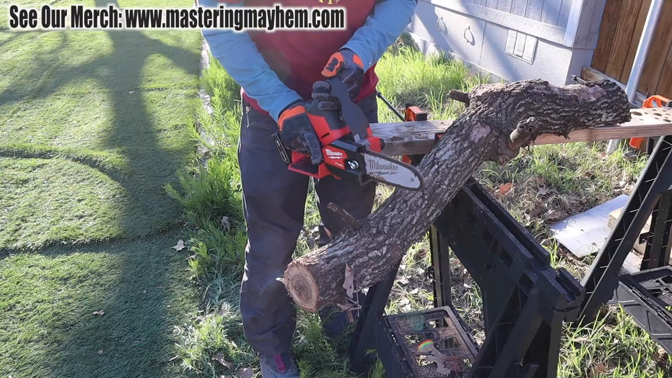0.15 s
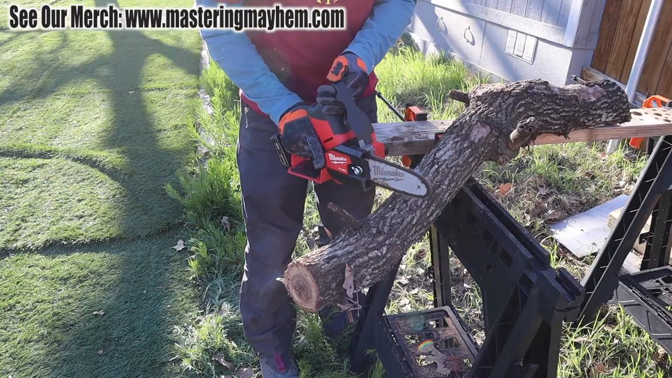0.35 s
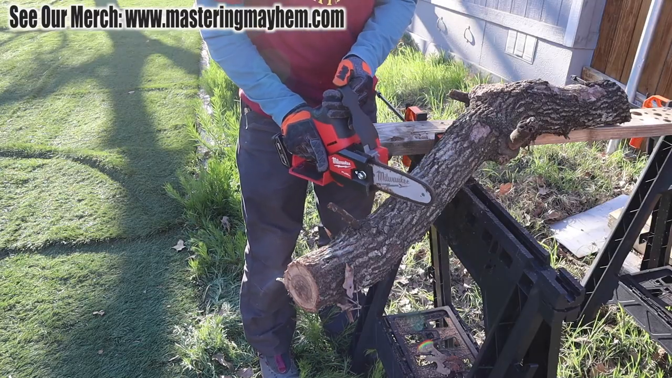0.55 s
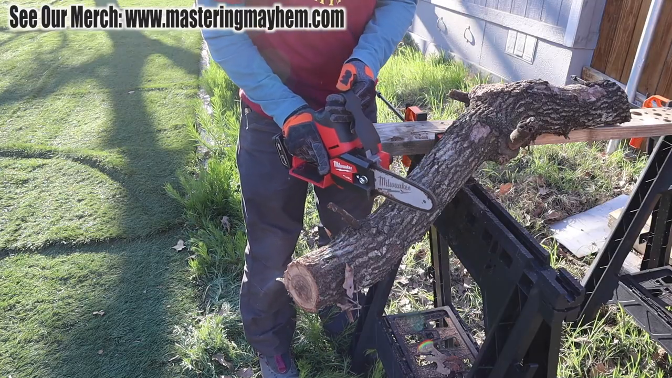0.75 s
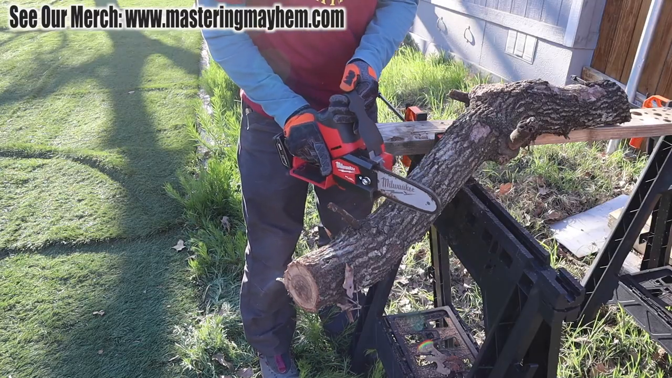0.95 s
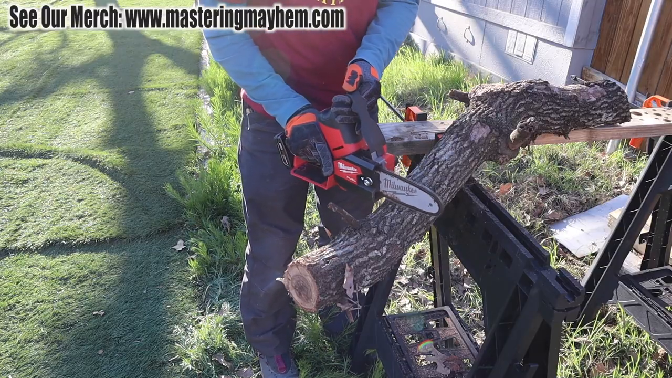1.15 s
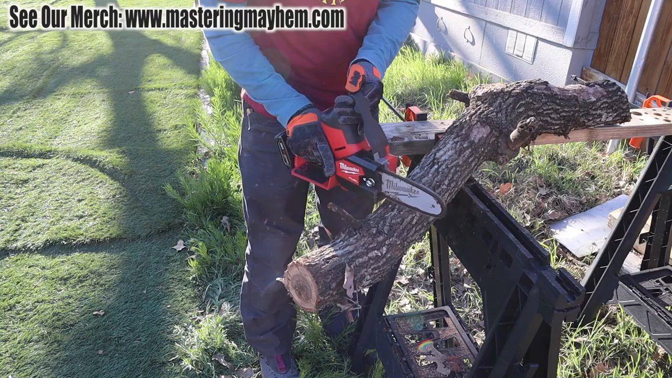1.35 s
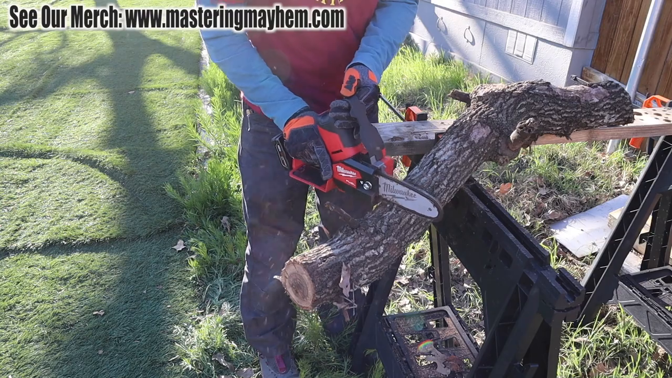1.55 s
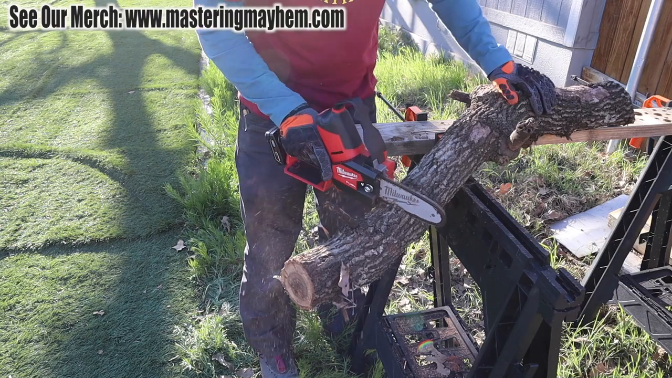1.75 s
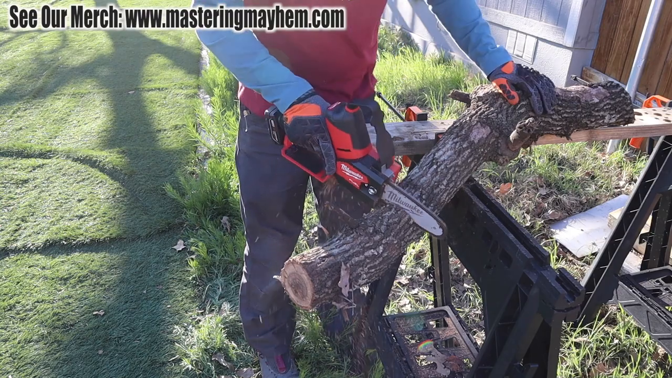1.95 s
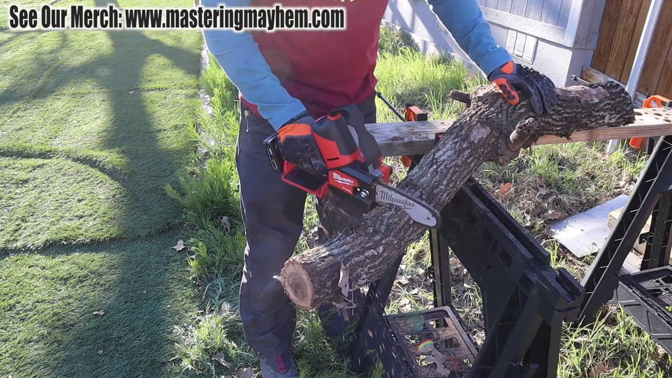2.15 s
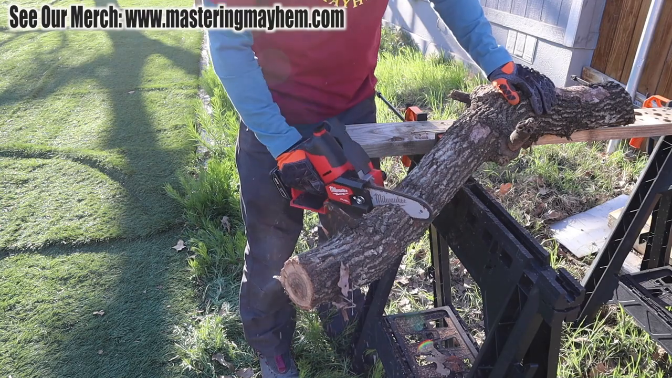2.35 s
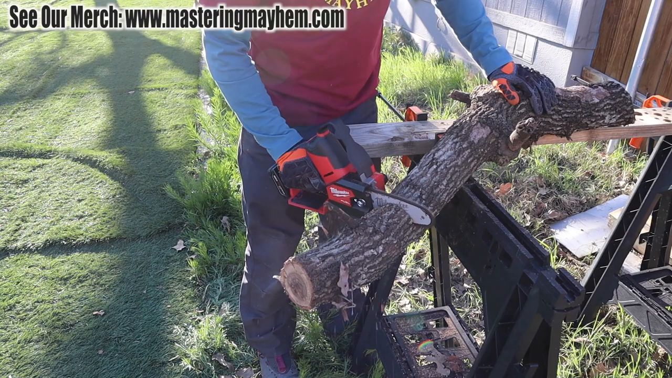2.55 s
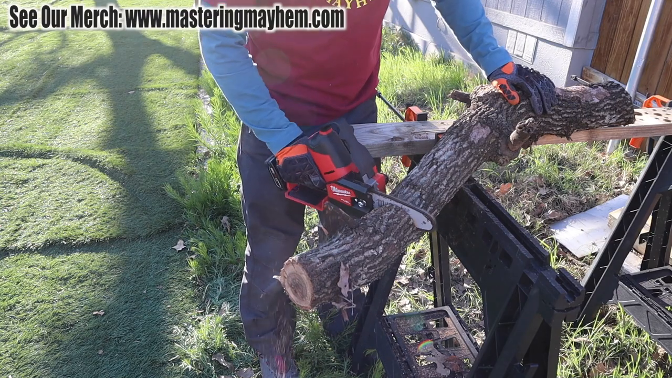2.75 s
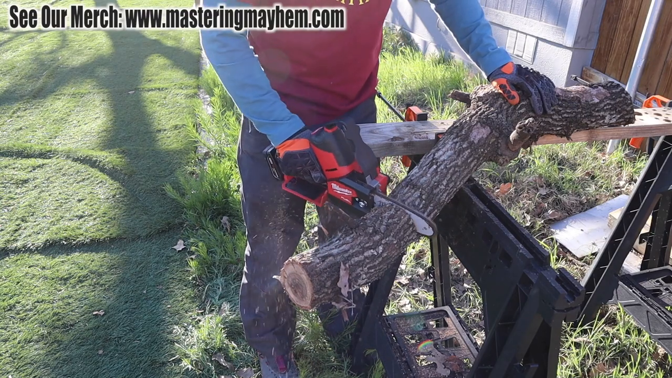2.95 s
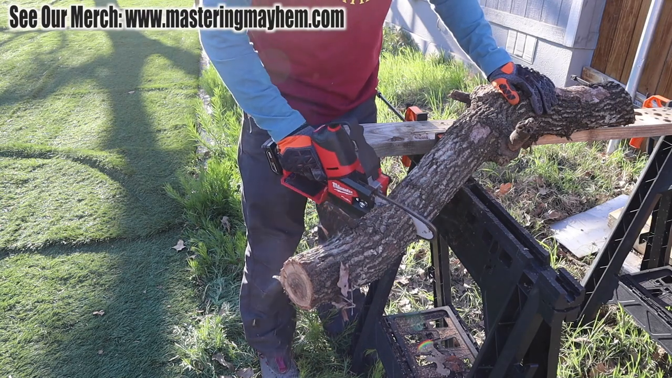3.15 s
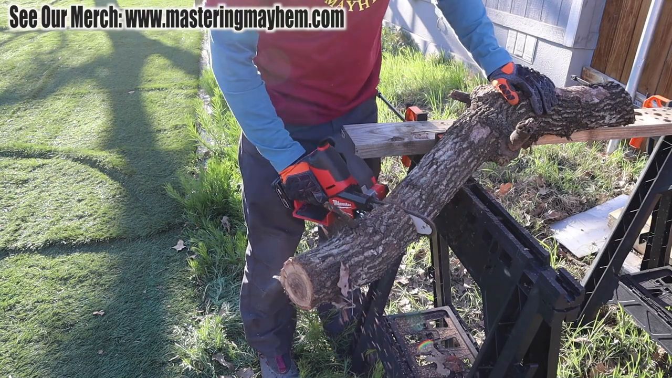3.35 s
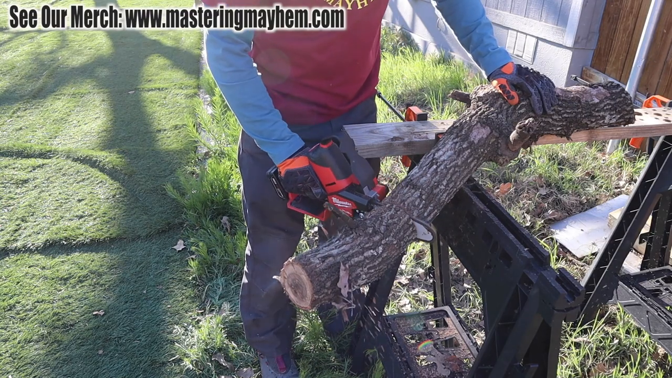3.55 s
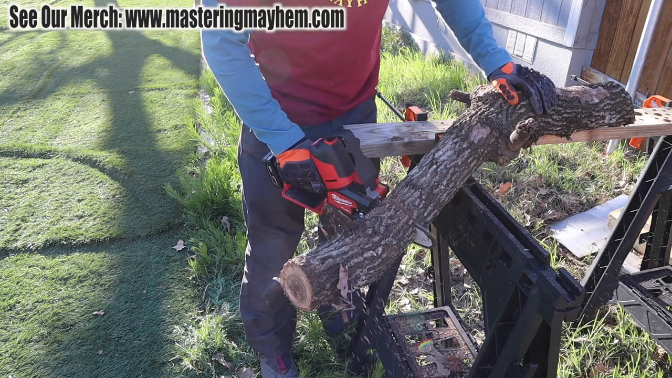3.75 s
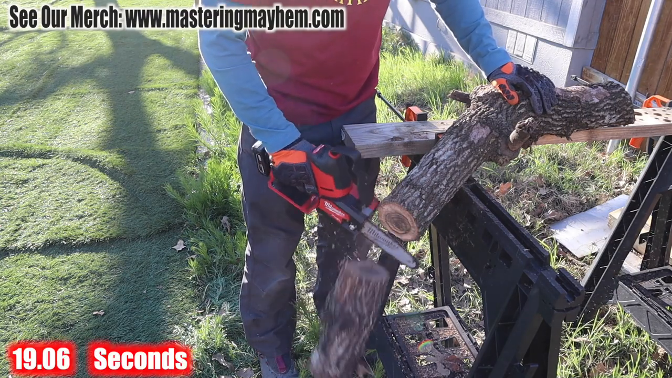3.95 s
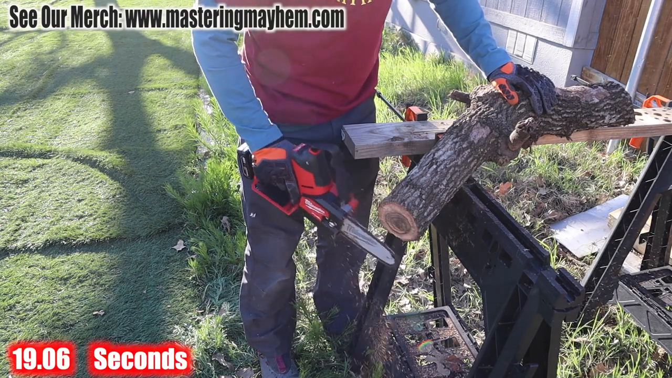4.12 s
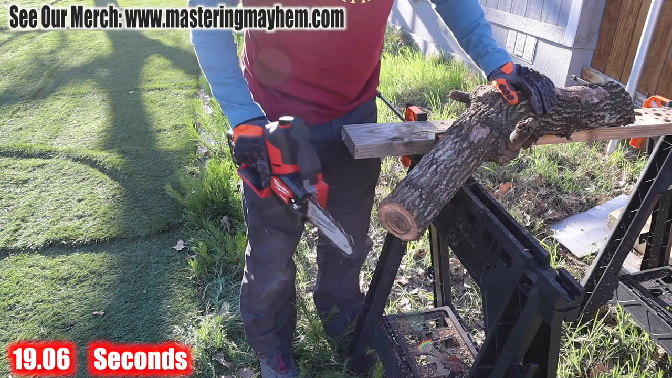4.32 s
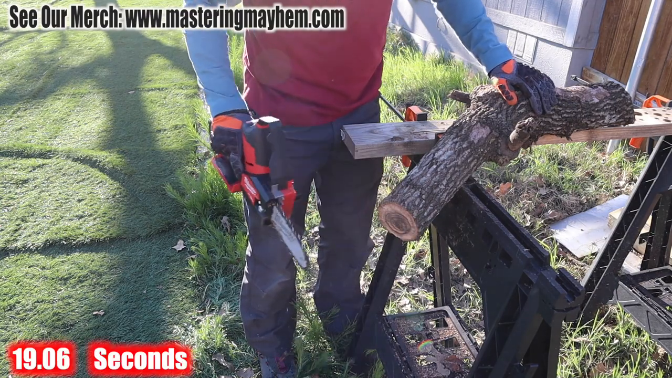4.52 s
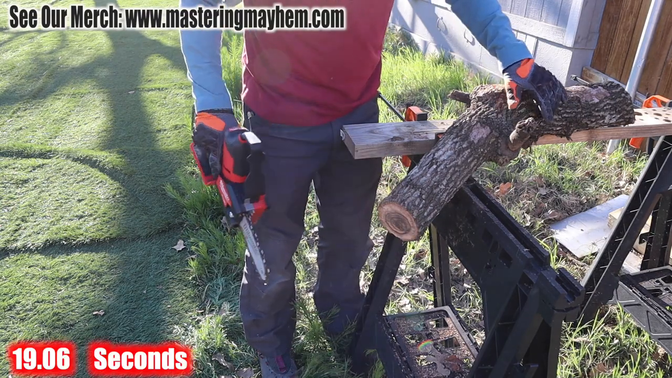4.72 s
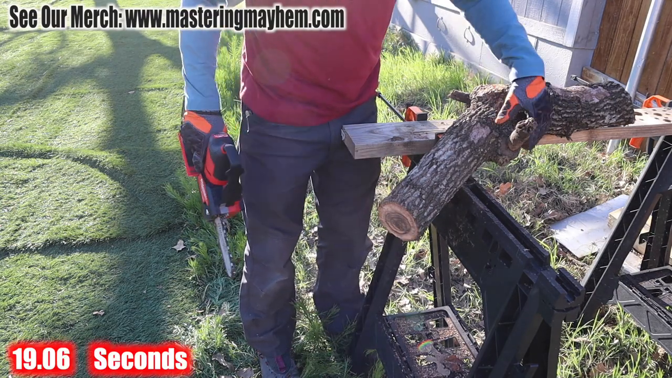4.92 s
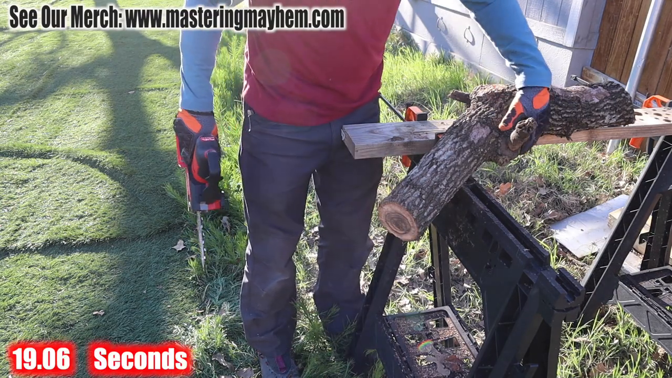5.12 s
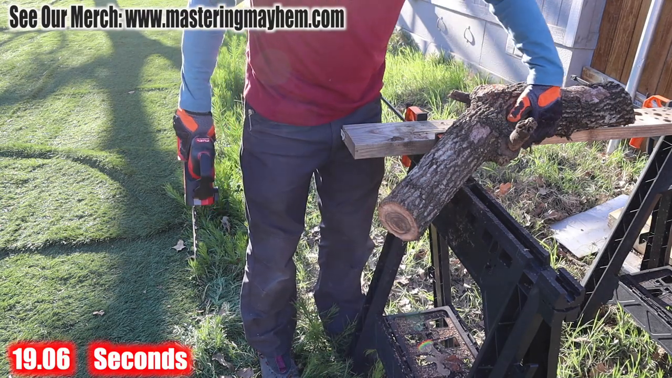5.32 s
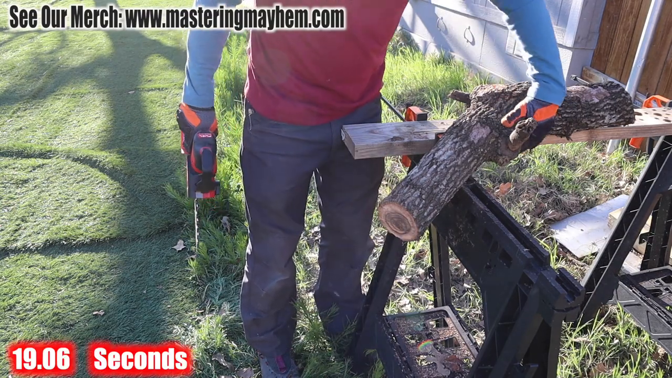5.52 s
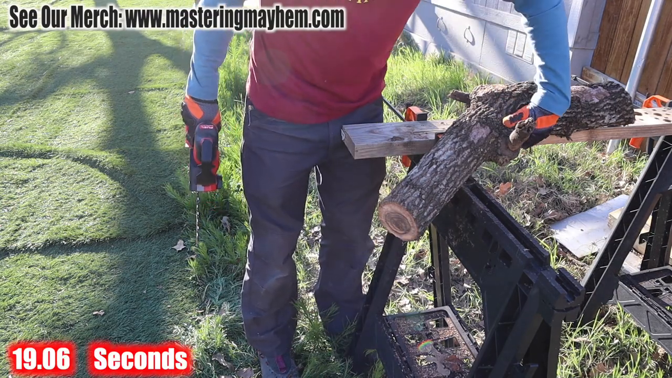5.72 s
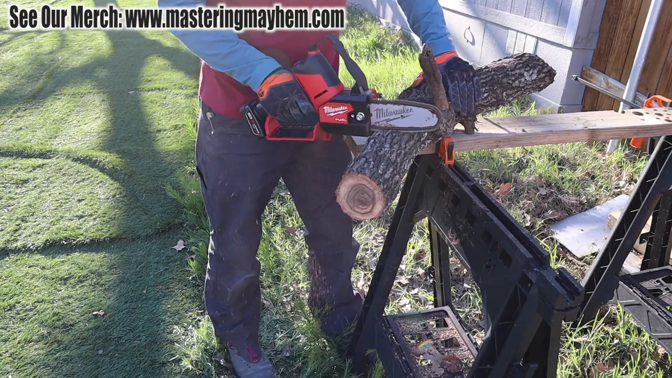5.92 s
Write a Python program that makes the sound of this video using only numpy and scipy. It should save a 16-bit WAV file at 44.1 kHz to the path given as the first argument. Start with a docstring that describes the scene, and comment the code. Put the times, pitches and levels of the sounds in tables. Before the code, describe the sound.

Outdoors and close to the microphone, a small battery chainsaw runs free with a bright rattling whine, snags bark, then digs into a log, dropping in pitch with a fuzzy squeal. The offcut lands with a hard thud as the chain coasts down, knocking and ticking to a stop. Glove rubs on bark follow in near quiet, then the saw abruptly restarts.

```python
"""Outdoors, close by: a cordless pruning saw runs free, bites into a log and cuts through it.
Chain links strike and scrape in the bar as noise paced by the shaft; motor and gears whine at multiples
of its speed, which sags under load. Log, bar and kerf answer as resonances driven by noise. The offcut thuds
on the ground, the chain coasts and knocks to a stop, a glove rubs the bark, and the saw starts again.
Light wind and a far hum lie behind, as coloured noise."""
import sys
import numpy as np
from scipy import signal
from scipy.fft import rfft, irfft
from scipy.io import wavfile
from scipy.ndimage import uniform_filter1d

SR = 44100
rng = np.random.default_rng(int(sys.argv[2]) if len(sys.argv) > 2 else 0)


def inscribe(sig):
    """Save sig as 16-bit PCM at rate SR to the path in sys.argv[1].

    A 1-D sig is mono; a 2-D sig holds one channel per row.
    Samples are clipped to [-1, 1] before scaling.
    """
    pcm = np.round(np.clip(np.atleast_2d(sig).T, -1, 1) * 32767)
    wavfile.write(sys.argv[1], SR, pcm.astype(np.int16))


N = 263541
T = np.arange(N) / SR  # time [s]

# trigger let go, motor silent, trigger pulled again [s]
RELEASE_S, STOP_S, RESTART_S = 3.95, 4.79, 5.886
SLACKEN_S = 0.033  # time the chain takes to go slack [s]


def amp(db):
    """Level law: decibels to amplitude gain."""
    return 10 ** (np.asarray(db) / 20)


def unit(x):
    """Normalisation by signal power: scales to rms 1."""
    return x / np.sqrt(np.mean(x ** 2) + 1e-20)


def curve(rows, axis=1):
    """Linear interpolation in time of one column of a table."""
    rows = np.array(rows)
    return np.interp(T, rows[:, 0], rows[:, axis])


def wander(hz):
    """Low-passed random fluctuation of rms 1, slow beside the given rate."""
    f = np.fft.rfftfreq(N, 1 / SR)
    lowpass = 1 / (1 + (f / hz) ** 4)
    return unit(irfft(rfft(rng.standard_normal(N)) * lowpass, N))


def colour(x, points):
    """Minimum-phase filtering: a causal response of unit energy with the given spectrum shape."""
    size = 4096
    hz, db = np.transpose(points)
    log_hz = np.log(abs(np.fft.fftfreq(size, 1 / SR)) + 1)
    log_gain = np.log(amp(np.interp(log_hz, np.log(hz), db)))
    # the Hilbert transform of the log gain gives the minimum phase
    spectrum = np.exp(np.conj(signal.hilbert(log_gain)))
    response = np.fft.ifft(spectrum).real[:size // 2]
    return signal.oaconvolve(x, response / np.linalg.norm(response))[:N]


def scrape(force, points):
    """Friction noise: a random contact force of changing strength excites one colour."""
    return colour(force * rng.standard_normal(N), points)


def swells(rows):
    """Gaussian envelopes: smooth rises and falls of gain, one for each row."""
    return sum(amp(db) * np.exp(-((T - s) / half_s) ** 2) for s, half_s, db in rows)


def gate(start_s, end_s, edge_s):
    """Trapezoidal envelope: one between two times, with straight edges."""
    return np.clip(np.minimum(T - start_s, end_s - T) / edge_s, 0, 1)


def resonate(x, hz, width):
    """Heterodyne resonance: two equal poles whose centre follows the curve hz."""
    turn = np.exp(2j * np.pi * np.cumsum(hz) / SR)
    r = np.exp(-np.pi * width / SR)
    # shift the centre down to zero frequency, low-pass, and shift back
    baseband = signal.lfilter([(1 - r) ** 2], np.poly([r, r]), x / turn)
    return (turn * baseband).real


def bursts(rows, points, decay_s):
    """Impact noise: exponentially dying contact forces excite one colour."""
    envelope = np.zeros(N)
    t = np.arange(2000) / SR
    for s, db in rows:
        part = envelope[round(s * SR):][:len(t)]
        part += amp(db) * np.exp(-t[:len(part)] / decay_s)
    return scrape(envelope, points)


# depth of the chain in the wood, taken as the share of full load: (time [s], share [0-1])
BITE_DEPTH = [(0, 0), (.8, 0), (1.45, 0.1), (1.9, 0.31), (2.3, 0.58), (2.6, 0.91), (3.9, 1), (4.3, 0),
              (6, 0.16)]


def bite_share():
    """Loading: the share of full load on the chain, from 0 to 1."""
    return np.clip(curve(BITE_DEPTH), 0, 1)


def in_wood():
    """Contact condition: one until the bar breaks through the log, then zero."""
    return np.clip((RELEASE_S - T) / SLACKEN_S, 0, 1)


def coasting():
    """Free run-down: zero under power, rising to one as the chain goes slack."""
    return np.clip((T - RELEASE_S) / SLACKEN_S, 0, 1) * (T < RESTART_S)


BREEZE_DB, FAR_DB = -62, -54.5  # steady levels [dB]
# gusts of wind on the microphone: (time of peak [s], half length [s], level [dB])
WIND_GUSTS = [(.7, .08, -54), (1.15, 0.13, -47), (2.2, .2, -51), (2.75, .15, -50), (3.8, 0.17, -54),
              (4.5, 0.28, -57), (5.1, 0.38, -50.5), (5.62, 0.15, -52)]
# the one swell of the far hum: (time of peak [s], half length [s], level [dB])
FAR_SWELL = [(5.72, 0.24, -53.5)]
# colour of the wind: (frequency [Hz], relative level [dB per Hz])
WIND_COLOUR = [(8, -12.5), (20, -3.5), (38, -3.5), (60, -10), (120, -18), (300, -45.5)]
# colour of the far hum: (frequency [Hz], relative level [dB per Hz])
HUM_COLOUR = [(41, -20.5), (70, -9), (118, -11.5), (156, -9.5), (440, -13), (535, -6.5), (599, -12),
              (689, -6), (792, -11.5), (2000, -32), (2600, -58), (4400, -120)]


def air():
    """Turbulent pressure noise of light wind on the microphone, and the far hum of the neighbourhood."""
    wind = scrape(amp(BREEZE_DB) + swells(WIND_GUSTS), WIND_COLOUR)
    hum = scrape(amp(FAR_DB) + swells(FAR_SWELL), HUM_COLOUR)
    return wind + hum


GLOVE_REST_DB = -61.5  # the glove shifting between strokes [dB]
# strokes of the glove over the bark: (time of peak [s], half length [s], level [dB])
GLOVE_STROKES = [(5.345, .035, -48.5), (5.41, 0.016, -58), (5.51, 0.053, -53), (5.59, 0.033, -50),
                 (5.7, .06, -62), (5.8, 0.092, -54.5)]
# colour of glove on bark: (frequency [Hz], relative level [dB per Hz])
BARK_COLOUR = [(590, -26), (1000, 2), (2200, -1), (2680, -3), (3210, 0.5), (3980, -3.5), (5660, -8.5),
               (7770, -18), (9430, -17), (15000, -23)]


def glove():
    """Stick-slip friction: fabric catches on the bark in fine grains."""
    grains = unit(rng.standard_normal(N) * amp(3.5 * wander(330)))
    stroke_gain = amp(GLOVE_REST_DB) + swells(GLOVE_STROKES)
    return (T > STOP_S) * stroke_gain * colour(grains, BARK_COLOUR)


# the thin ring after the stop: (time of peak [s], half length [s], level [dB])
THIN_RING_SWELL = [(5.24, .14, -63)]
# its narrow colour: (frequency [Hz], relative level [dB per Hz])
RING_COLOUR = [(2700, -50), (3090, -12), (3170, 0), (3250, -15), (3700, -48)]


def ring():
    """Narrow-band resonance: a faint ring that swells and fades."""
    return scrape(swells(THIN_RING_SWELL), RING_COLOUR)


# sharp clicks of splinter, chain and trigger: (time [s], level [dB])
CLICK_TIMES = [(4.1765, -16.5), (4.9275, -27), (5.037, -48), (5.049, -37), (5.243, -46), (5.268, -44),
               (5.448, -43), (5.503, -36.5), (5.532, -43), (5.8595, -42)]
# colour of a click: (frequency [Hz], relative level [dB per Hz])
CLICK_COLOUR = [(400, 3), (1200, -1), (3200, 2), (4400, 1), (5250, 7.5), (6500, -0.5), (9000, -3),
                (15000, -27)]


def clicks():
    """Brief impact: a very short force excites a wide band."""
    return bursts(CLICK_TIMES, CLICK_COLOUR, decay_s=0.0017)


RATCHET_S, RATCHET_GAP_S = 4.819, .01235  # first tick, spacing [s]
RATCHET_DB, RATCHET_STEP_DB = -26, -.5  # level of the first tick, change at each further one [dB]


def ratchet(count):
    """Periodic impact: the last links tick evenly over the sprocket, each softer, as rows (s, dB)."""
    return [(RATCHET_S + k * RATCHET_GAP_S, RATCHET_DB + k * RATCHET_STEP_DB) for k in range(count)]


# stray knocks of the slack chain: (time [s], level [dB])
STRAY_KNOCKS = [(4.648, -26), (4.7, -29), (4.754, -27.5), (4.797, -29.5), (4.805, -29), (4.813, -27)]
# colour of a link knocking: (frequency [Hz], relative level [dB per Hz])
KNOCK_COLOUR = [(300, -24), (560, -19), (700, -9.5), (920, 1.5), (1200, -2), (1430, -3.5), (1750, -11),
                (2200, -11.5), (3800, -21), (4400, -27), (5000, -23), (6500, -47), (8900, -30),
                (10500, -53)]


def knocks():
    """Impact of loose bodies: slack links strike singly and then in an even run."""
    return bursts([*STRAY_KNOCKS, *ratchet(count=9)], KNOCK_COLOUR, decay_s=0.0042)


# teeth snag on bark and throw chips: (time [s], level [dB])
SNAG_TIMES = [(.311, -22.5), (.785, -14.5), (.988, -12), (1.09, -15), (1.155, -10.5), (1.298, -10),
              (1.331, -8.5), (1.404, -11), (1.444, -10), (1.615, -10), (1.733, -28), (2.342, -14),
              (2.55, -22), (2.645, -9.5), (2.652, -16.5), (2.692, -22), (2.788, -15.5), (3.374, -13),
              (3.772, -20), (3.916, -13)]
# colour of a snag: (frequency [Hz], relative level [dB per Hz])
SNAG_COLOUR = [(300, -20.5), (1200, -2), (2200, -0.5), (3600, 2), (7000, -10), (13000, -11), (16000, -19)]


def snags():
    """Fracture impact: a tooth catches and its force dies within milliseconds."""
    return bursts(SNAG_TIMES, SNAG_COLOUR, decay_s=0.0026)


# the log jumps under the bar, then the offcut lands: (time [s], level [dB], pitch factor)
THUD_BLOWS = [(1.592, -32, 0.46), (1.902, -19, 0.35), (2.062, -42, 0.35), (2.553, -26, 0.48),
              (3.749, -23, 0.41), (3.786, -24, 0.27), (3.867, -20, 0.398), (4.18, -1, 1),
              (4.191, -20, 0.69)]
# modes of a blow at pitch factor 1: (frequency [Hz], relative level [dB], time to fall 60 dB [s])
WOOD_BLOW_MODES = [(266, -3, 0.019), (503, -1.5, 0.008), (674, -20.5, 0.006)]


def thuds():
    """Damped modal impact: heavy wood on something soft, with little deep bass radiated."""
    out = np.zeros(N)
    t = np.arange(5000) / SR
    for s, db, pitch in THUD_BLOWS:
        blow = np.zeros(len(t))
        for hz, mode_db, t60 in WOOD_BLOW_MODES:
            # a lower pitch also rings longer
            decay = np.exp(-np.log(1000) * t * pitch / t60)
            blow += amp(db + mode_db) * decay * np.sin(2 * np.pi * hz * pitch * t)
        highpass = signal.butter(2, 110 * pitch, "high", fs=SR)
        out[round(s * SR):][:len(t)] -= signal.lfilter(*highpass, blow)
    return out


# tremble of the log: level with the chain free, deep in the cut, unevenness [dB]; its rate [Hz]
SHUDDER_FREE_DB, SHUDDER_CUT_DB, SHUDDER_UNEVEN_DB, SHUDDER_HZ = -63, -46, 3.5, 10
# low buffeting as the teeth dig in: level [dB]; start, end and edge [s]
BUFFET_DB = -34.5
BUFFET_S, BUFFET_END_S, BUFFET_EDGE_S = 1.893, 2.08, 0.0081
# colour of the shaking log: (frequency [Hz], relative level [dB per Hz])
TREMBLE_COLOUR = [(15, -22), (40, -5), (75, 0), (115, -1), (160, 6), (250, 8.5), (380, -23), (700, -53.5)]
# colour of the buffeting: (frequency [Hz], relative level [dB per Hz])
BUFFET_COLOUR = [(12, -16), (35, -1.5), (90, -4), (130, -13), (230, -11.5), (400, -20), (700, -48)]


def shudder():
    """Forced vibration: the log trembles more the deeper the teeth pull, with one low buffeting."""
    level_db = SHUDDER_FREE_DB + (SHUDDER_CUT_DB - SHUDDER_FREE_DB) * bite_share()
    tremble = in_wood() * amp(level_db + SHUDDER_UNEVEN_DB * wander(SHUDDER_HZ))
    buffet = amp(BUFFET_DB) * gate(BUFFET_S, BUFFET_END_S, BUFFET_EDGE_S)
    return scrape(tremble, TREMBLE_COLOUR) + scrape(buffet, BUFFET_COLOUR)


# the bending note, which in the end sinks as the kerf deepens: (time [s], frequency [Hz], level [dB])
BENDING_NOTE = [(0, 466, -45.5), (1.25, 466, -41), (1.55, 477, -35.5), (1.98, 497, -33), (2.15, 485, -33.5),
                (2.95, 475, -44.5), (3.3, 397, -44), (3.55, 354, -34.5), (3.9, 293, -44)]
# modes: (multiple of the note, pole width [Hz], relative level at first touch [dB], deep in the cut [dB])
BENDING_MODES = [(1, 35, -0.5, -3), (.41, 27, -54, -7)]


def log_note():
    """Resonance under random excitation: the teeth keep the log's bending modes ringing."""
    hz, level_db = curve(BENDING_NOTE, axis=1), curve(BENDING_NOTE, axis=2)
    bite = bite_share()
    out = np.zeros(N)
    for multiple, width, touch_db, deep_db in BENDING_MODES:
        mode_db = touch_db + (deep_db - touch_db) * bite
        out += amp(level_db + mode_db) * unit(resonate(rng.standard_normal(N), hz * multiple, width))
    return in_wood() * out


SQUEAL_DB, SQUEAL_WIDTH_HZ, SQUEAL_EDGE_S = -25.5, 160, 0.04  # level, pole width, edges
# pitch of the squeal, wandering with the pressure: (time [s], frequency [Hz])
SQUEAL_PITCH = [(2.5, 3750), (2.63, 4150), (2.8, 3600), (3.05, 3620), (3.24, 3760), (3.4, 3480),
                (3.62, 3870), (3.9, 3850)]


def squeal():
    """Friction-driven resonance: the kerf excites one fuzzy resonance of the bar."""
    tone = unit(resonate(rng.standard_normal(N), curve(SQUEAL_PITCH), SQUEAL_WIDTH_HZ))
    return amp(SQUEAL_DB) * gate(SQUEAL_PITCH[0][0], SQUEAL_PITCH[-1][0], SQUEAL_EDGE_S) * tone


# time constant of drag [s]; deceleration by dry friction [turns per second squared]
DRAG_S, FRICTION_TURNS_PER_S2 = .7, 186
# speed with the trigger held, sagging under load: (time [s], speed [turns per second])
DRIVEN_SPEED = [(0, 370), (.77, 371), (1.2, 368.5), (1.52, 366), (1.72, 350), (1.98, 326), (2.1, 339),
                (2.32, 343), (2.45, 324), (2.6, 330), (2.72, 319), (3.05, 322), (3.4, 321), (3.58, 326),
                (3.88, 320), (3.95, 340), (5.886, 348), (5.98, 356)]


def motor_speed():
    """Run-down under viscous drag and dry friction: turns a second, and the share of release speed left."""
    driven = curve(DRIVEN_SPEED)
    start = driven[round(RELEASE_S * SR)]
    friction = FRICTION_TURNS_PER_S2 * DRAG_S
    since_release = np.clip(T - RELEASE_S, 0, STOP_S - RELEASE_S)
    spin = (start + friction) * np.exp(-since_release / DRAG_S) - friction
    released = (T > RELEASE_S) & (T < RESTART_S)
    return np.where(released, spin, driven), np.where(released, spin / start, 1)


# lines of motor and gears: (multiple of motor speed, level free [dB], loaded [dB], coasting [dB])
MOTOR_ORDERS = [(2.615, -33, -38, -55), (3, -31, -39, -35), (3.213, -31, -37, -55), (4, -37, -38, -55),
                (4.5, -50, -50, -34), (5, -35, -42, -50), (5.36, -36, -42, -55), (5.6, -36, -39, -42),
                (6, -28.5, -30, -46), (6.641, -34.5, -46, -52), (8.649, -33.5, -41, -47),
                (9.42, -35, -44, -55), (11, -39, -33, -34.5), (12, -41, -33, -52), (13, -28, -50, -55),
                (23, -41.5, -60, -65), (26, -42.5, -58, -60), (26.64, -48, -62, -65), (30, -46, -62, -65),
                (39, -53, -65, -70)]


def whine(turns, shares):
    """Order spectrum: shimmering lines locked to the shaft; load and braking bring out different ones."""
    out = np.zeros(N)
    shimmer_db = 1 + 1.5 * (1 - shares[0])
    for order, *state_db in MOTOR_ORDERS:
        height = np.sqrt(2) * amp(np.array(state_db) @ shares + shimmer_db * wander(50))
        out += height * np.cos(2 * np.pi * (order * turns + rng.random()))
    # the small housing radiates the low notes poorly
    housing = signal.butter(8, 810, "high", fs=SR, output="sos")
    return signal.sosfilt(housing, out)


def chatter(links, slap_db, fade, smooth, flutter_db):
    """Repeated impact: links slap with uneven strength and timing, each scraping on until the next."""
    links = links + .13 * wander(90) + 2  # the 2 keeps the count positive
    strength = amp(slap_db * np.clip(rng.standard_normal(4000), -2.5, 2))
    force = strength[links.astype(int)]
    slaps = unit(force * np.exp(-(links % 1) / fade))
    return unit((smooth + slaps) * amp(flutter_db * wander(53)))


LINKS_PER_TURN = .6424
RESTART_DB = -16  # base level of the chain after the stop [dB]
WHINE_FALL_DB = 10  # whine lost as the coasting speed falls tenfold [dB]
# layers relative to the base level: free, in the cut, coasting, loss per tenfold fall in speed [dB]
CHAIN_DB = (-0.5, -0.5, -5.5, 16.5)
SIZZLE_DB = (-13.5, -15, -20.5, 37)
DRONE_DB = (-20.5, -14.5, -22, 19.5)
# base level of the chain under power: (time [s], level [dB])
CHAIN_EFFORT = [(0, -16), (.16, -16), (.23, -13.5), (.6, -15), (1.06, -15.5), (1.35, -15.5), (1.65, -16.5),
                (1.85, -15.5), (2.15, -17.5), (2.44, -16.5), (2.55, -15), (2.72, -16), (3.4, -15.5),
                (3.65, -17), (3.92, -17)]
# the motor sings out when the pressure on the bar eases: (time [s], relative level [dB])
WHINE_LEVEL = [(0, -1.5), (.3, .5), (.8, .5), (1.2, -2), (1.95, -4), (2.14, 3), (2.32, 3), (2.42, -3),
               (3.4, -3), (3.85, 0)]
# colours of bar and housing, free, in the cut and coasting: (frequency [Hz], relative level [dB per Hz])
FREE_COLOUR = [(450, -32.5), (700, -11), (900, -8), (1050, -5), (1210, 5.5), (1400, -4.5), (1630, -9),
               (2080, -5), (2450, -5), (3000, -6.5), (3520, 0), (4450, -12), (6050, -13.5), (7000, -39.5)]
CUTTING_COLOUR = [(450, -31.5), (720, -15), (910, -3), (1030, -9.5), (1250, 1), (1600, -11), (1950, -4),
                  (2350, -8), (3000, -6.5), (3700, -5.5), (4600, -12), (5950, -16.5), (7000, -24.5),
                  (9000, -71)]
COASTING_COLOUR = [(300, -26.5), (550, -21), (720, -5.5), (930, 0), (1200, 4), (1500, -0.5), (1750, -4.5),
                   (2150, -3.5), (3500, -1), (3950, -4), (4400, -10), (5800, -15), (7000, -23),
                   (10000, -39)]
# colours of the steel's sizzle and of the log: (frequency [Hz], relative level [dB per Hz])
STEEL_COLOUR = [(3710, -36.5), (6300, -1), (7360, -4), (9310, 1), (10300, -2.5), (11500, -2), (14200, -7.5),
                (15600, -12.5)]
LOG_COLOUR = [(90, -51.5), (170, -28), (260, -15), (340, -6.5), (410, -3.5), (480, 0), (570, -1.5),
              (700, 3.5), (800, -10), (950, -34.5)]


def saw():
    """Shaft-locked excitation: chain, wood and motor all follow the turning of the shaft."""
    speed, left = motor_speed()
    bite, coast = bite_share(), coasting()
    shares = np.array([(1 - bite) * (1 - coast), bite * (1 - coast), coast])  # free, loaded, coasting
    # the load changes from tooth to tooth, so the speed is less steady in the cut
    unsteadiness = .0008 + .008 * shares[1] ** 2 + .004 * coast
    turns = np.cumsum(speed * (1 + unsteadiness * wander(25))) / SR
    links = turns * LINKS_PER_TURN

    effort_db = np.where(T < STOP_S, curve(CHAIN_EFFORT), RESTART_DB)
    slowing = np.log10(np.maximum(left, .09))

    def layer_gain(layer_db):
        """Level law of one layer: a mix of the three states, falling with the logarithm of speed."""
        *state_db, fall_db = layer_db
        return amp(effort_db + np.array(state_db) @ shares + fall_db * slowing)

    taut = chatter(links, slap_db=2.5, fade=0.77, smooth=0.93, flutter_db=0.49)
    slack = chatter(links, slap_db=1.0, fade=0.84, smooth=0.91, flutter_db=0.5)
    states = [scrape(taut, FREE_COLOUR), scrape(taut, CUTTING_COLOUR), scrape(slack, COASTING_COLOUR)]
    rattle = (np.sqrt(shares) * states).sum(0)
    rattle /= np.sqrt(uniform_filter1d(rattle ** 2, size=4000))  # even out the running level

    chain = layer_gain(CHAIN_DB) * rattle
    sizzle = layer_gain(SIZZLE_DB) * amp(1.0 * wander(55)) * scrape(taut, STEEL_COLOUR)
    wood = layer_gain(DRONE_DB) * scrape(taut, LOG_COLOUR)
    motor = amp(curve(WHINE_LEVEL) + WHINE_FALL_DB * slowing) * whine(turns, shares)
    running = np.interp(T, [STOP_S - .01, STOP_S, RESTART_S, RESTART_S + .002], [1, 0, 0, 1])
    return running * (chain + sizzle + wood + motor)


def scene():
    """Superposition: the pressures of all sources add at one close microphone."""
    background = air() + glove() + ring()
    contacts = clicks() + knocks() + snags() + thuds()
    log = shudder() + log_note()
    return (background + contacts + log + squeal() + saw())[None]


def record(dry):
    """Band limitation: a linear-phase low-pass filter removes the highest treble."""
    lowpass = signal.firwin(511, 15800, window=("kaiser", 9), fs=SR)  # edge in Hz
    return signal.oaconvolve(dry, lowpass[None], "same")


dry = scene()
out = record(dry)
inscribe(out)
```